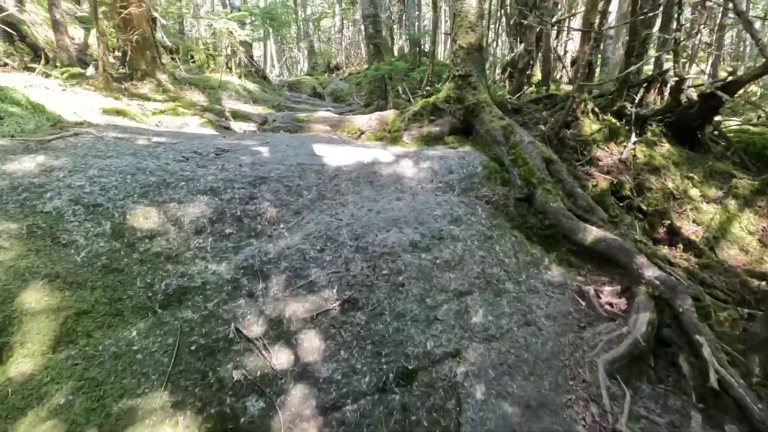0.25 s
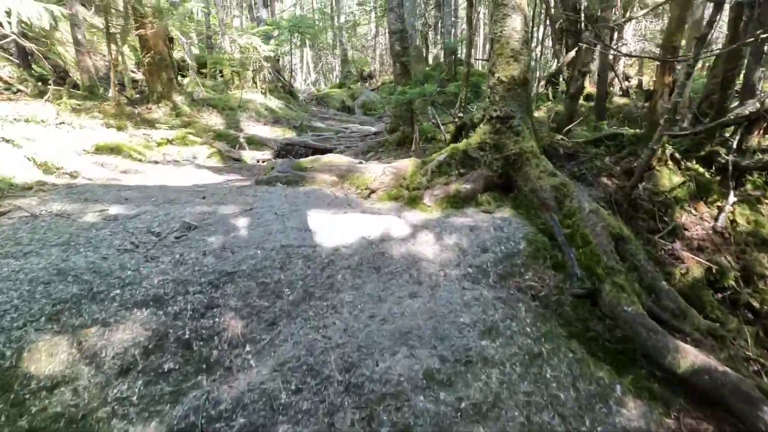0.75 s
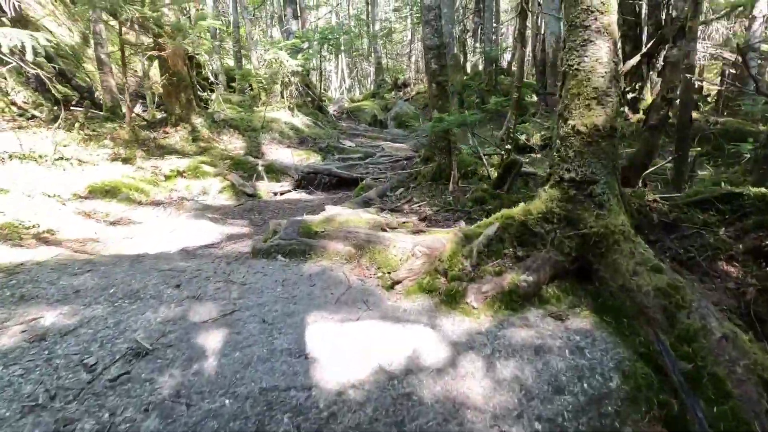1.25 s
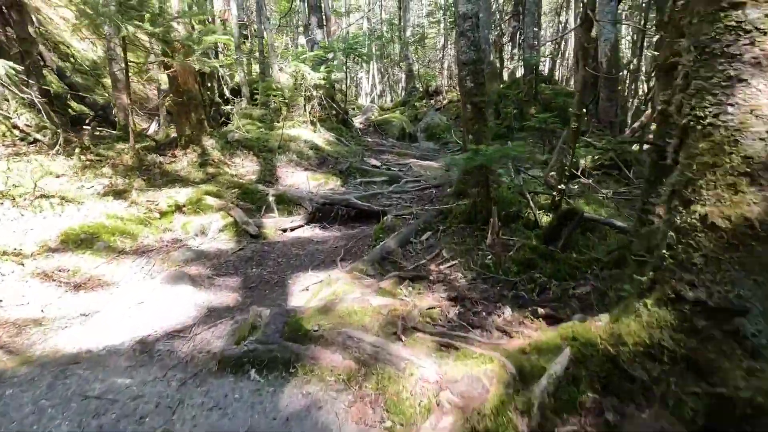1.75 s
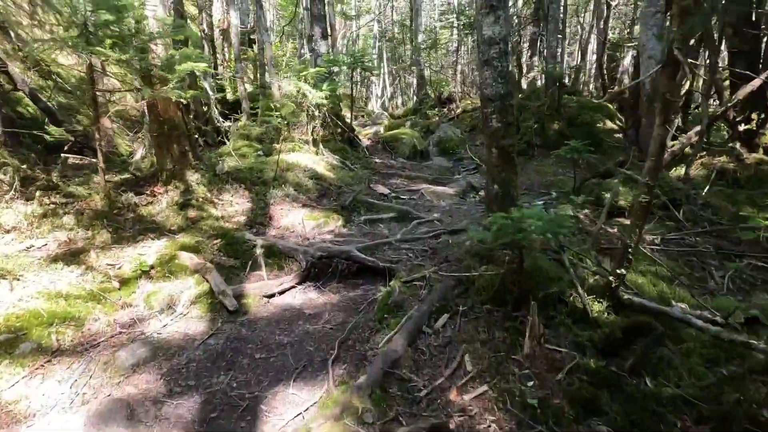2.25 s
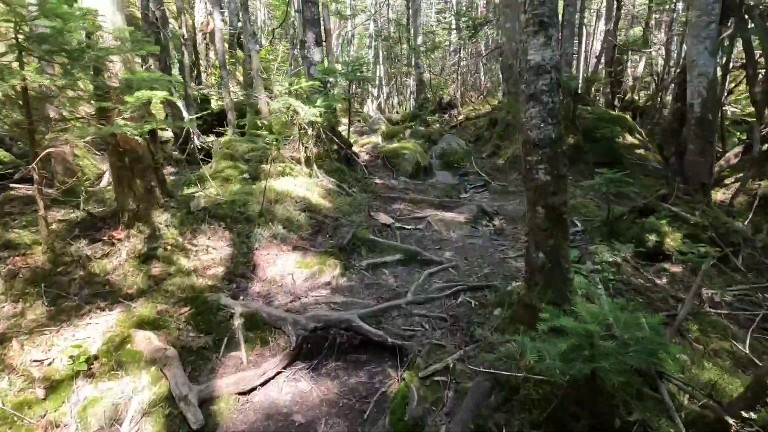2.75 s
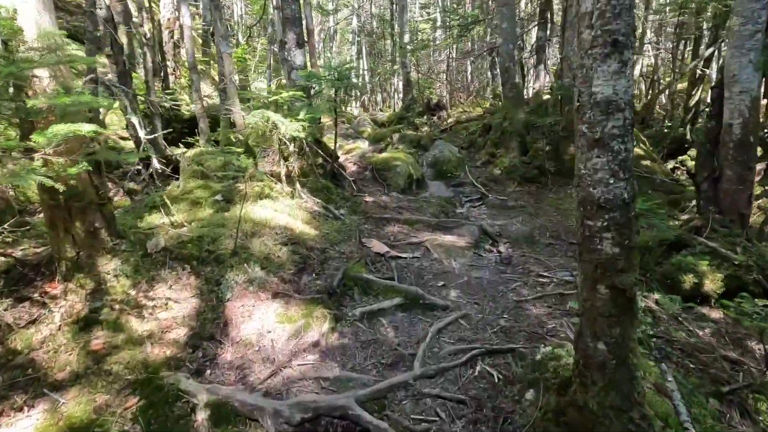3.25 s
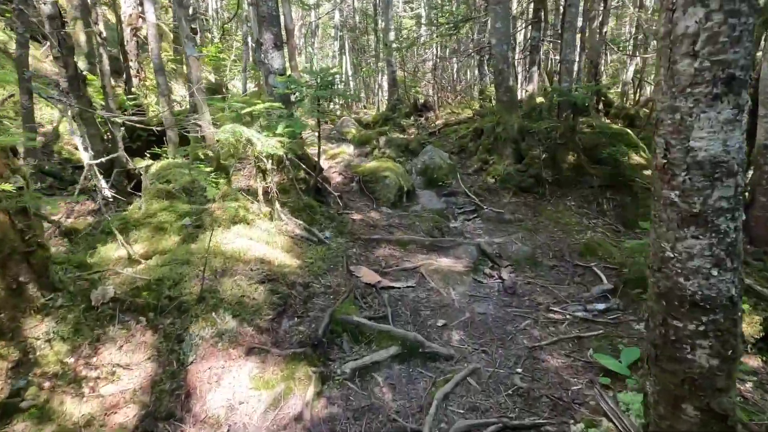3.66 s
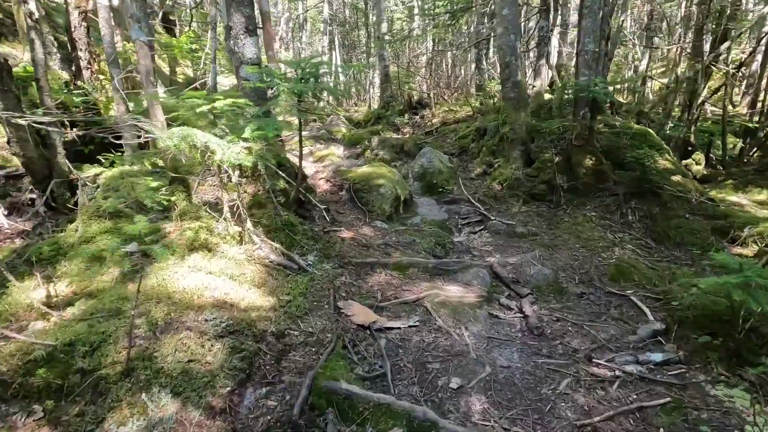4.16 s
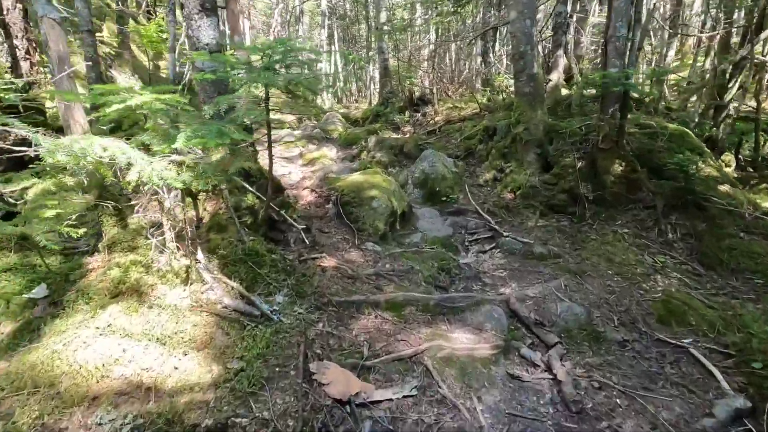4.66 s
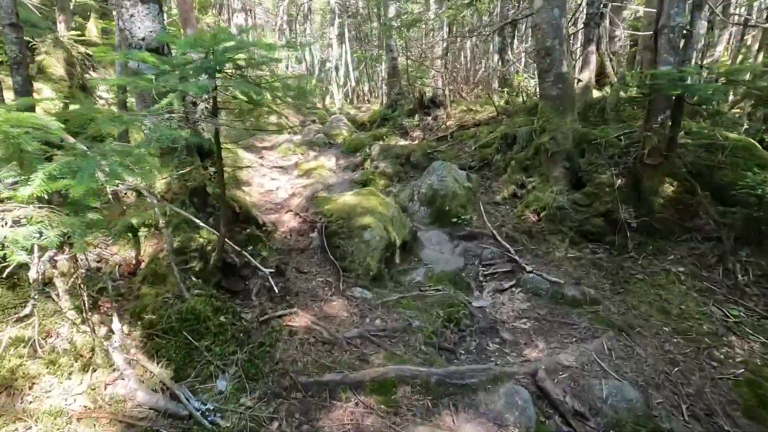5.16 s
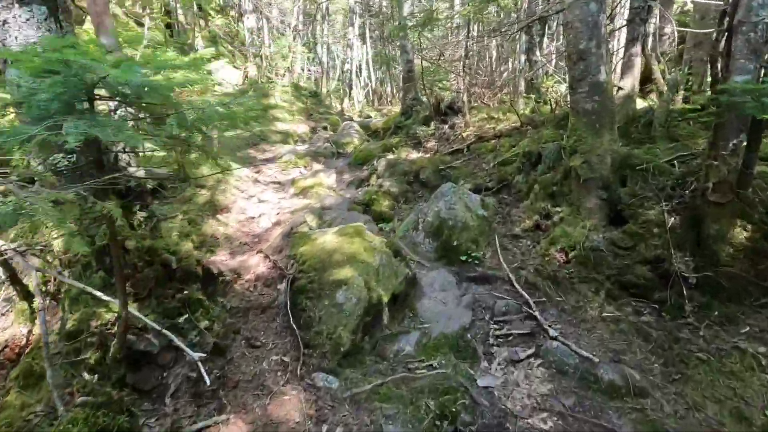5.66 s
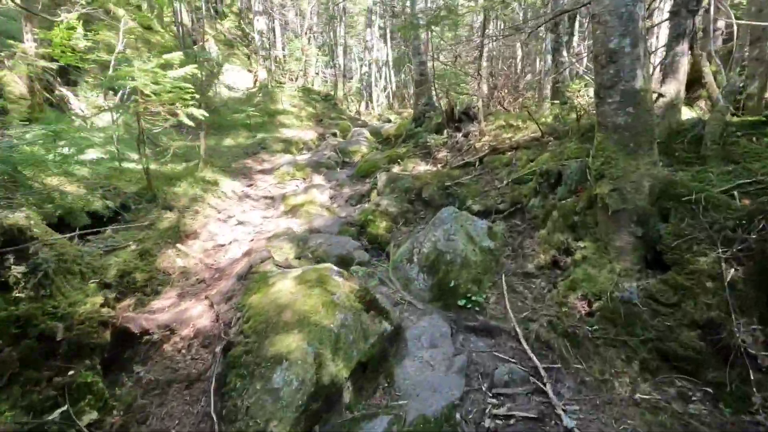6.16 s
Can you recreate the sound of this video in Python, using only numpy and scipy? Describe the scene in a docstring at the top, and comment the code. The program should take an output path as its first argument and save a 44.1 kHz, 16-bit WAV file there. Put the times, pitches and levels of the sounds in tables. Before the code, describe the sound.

Boots step unevenly along a woodland trail of dirt, roots and needles, with soft thuds, gritty scuffs and snapping twigs; a faint bird buzzes far off.

```python
"""Boots step down a forest trail of dirt, roots and needles, close to the two ports of a hand-held camera.
Heels thud as sinking tones on hollow soil, soles scuff in bursts of grains, twigs snap as damped modes.
Litter and clothes rustle between steps as swelling noise; far off a small bird repeats a thin buzzing note.
Other far birds slur and twitter; forest hush and low pressure swings of the swaying camera lie beneath."""
import sys
import numpy as np
from scipy import signal
from scipy.fft import rfft, irfft, next_fast_len
from scipy.io import wavfile
from scipy.ndimage import map_coordinates

SR = 44100
rng = np.random.default_rng(int(sys.argv[2]) if len(sys.argv) > 2 else 0)


def waveform_to_disk(signal):
    """Save audio, clipped to [-1, 1], as 16-bit WAV at the path in sys.argv[1]."""
    frames = np.transpose(np.atleast_2d(signal))
    scaled = np.clip(frames, -1, 1) * 32767
    samples = np.round(scaled).astype(np.int16)
    wavfile.write(sys.argv[1], SR, samples)


N = 282681

# Boot landings, close by: (heel time [s], heel peak [dB], base pitch [Hz], sole peak [dB],
# weight peak [dB], crunch soil drive [dB], roll from heel to weight [s])
LANDINGS = [(0.283, -28.5, 166, -56, -47, -59, 0.031), (0.347, -29.5, 167, -68, -53, -58, 0.034),
            (0.46, -46.5, 285, -69, -64, -63, 0.045), (0.821, -49, 398, -58, -72, -52.5, 0.035),
            (1.161, -47.5, 480, -39, -57, -55, 0.027), (1.244, -61, 337, -36.5, -44, -68, 0.027),
            (1.916, -28.5, 312, -60, -62, -45, 0.03), (1.93, -35, 370, -56, -51, -47, 0.011),
            (2.481, -35.5, 557, -58, -69, -50, 0.05), (2.6048, -12, 427, -32.5, -30, -41.5, .0145),
            (3.321, -35, 292, -59, -37, -43.5, 0.031), (3.367, -26.5, 462, -44, -44, -55, 0.029),
            (3.522, -27.5, 330, -33, -56, -51, 0.0236), (4.025, -32.5, 503, -35, -35, -44, 0.04),
            (4.537, -41.5, 517, -43, -55, -58, 0.029), (4.638, -44, 333, -45.5, -41.5, -52, 0.066),
            (5.196, -30.5, 335, -53, -52, -40, 0.012), (5.2124, -27.5, 413, -30, -36, -58, 0.024),
            (5.825, -39.5, 303, -49, -65, -51, 0.036), (5.996, -41, 162, -40, -49, -63, 0.028),
            (6.129, -38, 328, -54, -71, -52, 0.024), (6.192, -46, 463, -51, -76, -50.5, 0.026)]
HEEL_T60_S, SOLE_T60_S = 0.027, 0.039
HEEL_ROUGH, SOLE_ROUGH = .1, .7  # 0 smooth, 1 all uneven slips
SOLE_SHARE, SOLE_PITCH = .44, 0.783  # of the roll; of the heel's pitch
WEIGHT_BASE_HZ, WEIGHT_T60_S = 130, 0.043


def contacts():
    """Heel strikes, lower-pitched sole follows, weight pushes last: (s, peak dB, base Hz, t60 s, roughness)."""
    for s, heel_db, hz, sole_db, weight_db, _, roll in LANDINGS:
        yield s, heel_db, hz, HEEL_T60_S, HEEL_ROUGH
        yield s + SOLE_SHARE * roll, sole_db, hz * SOLE_PITCH, SOLE_T60_S, SOLE_ROUGH
        yield s + roll, weight_db, WEIGHT_BASE_HZ, WEIGHT_T60_S, HEEL_ROUGH


# Root-laced ground under a boot: (mean mode pitch [Hz], strength before coupling [dB], t60 [s])
HOLLOW_MODES = [(161.8, -8, 0.076), (253.7, 0.5, 0.043), (330.8, -1, 0.038), (663, -2, 0.025),
                (935, 7, 0.034), (1350, 12, 0.012)]


def thuds(glide=2.03, settle_s=0.00092, sag=0.741, attack_s=0.0013, ring_db=-3, reach=1.36):
    """A boot loads the soil: its pitch sinks as the contact widens, and the hollow ground answers."""
    out, t = np.zeros(N), np.arange(SR // 6) / SR
    mode_hz, mode_db, mode_t60 = np.transpose(HOLLOW_MODES)[..., None]
    for s, db, hz, t60, rough in contacts():
        pitch = hz * (sag + glide * np.exp(-t / settle_s))
        carrier = tone(pitch)
        # the soil gives way unevenly
        unevenness = map_coordinates(rng.standard_normal(len(t)), [hz * t])
        slips = np.sqrt(2) * carrier * unevenness
        push = ((1 - rough) * carrier + rough * slips) * amp(-60 * t / t60)
        # a soft contact wakes the low modes, a hard one the high modes
        coupling = 1 / (1 + (mode_hz / (reach * hz)) ** 4) / (1 + (.5 * hz / mode_hz) ** 2)
        # each spot of ground differs a little
        detune, strength_db = rng.normal([[[1]], [[0]]], [[[.05]], [[2]]], (2, len(HOLLOW_MODES), 1))
        decay = amp(mode_db + strength_db - 60 * t / mode_t60)
        ring = np.sum(coupling * decay * np.sin(2 * np.pi * mode_hz * detune * t), axis=0)
        blow = (push + amp(ring_db) * ring) * (1 - np.exp(-t / attack_s))
        add(out, s, amp(db) * blow / np.abs(blow).max())
    return np.array([out, out])


# Fine grit under the sole, also splinters: (frequency [Hz], density [dB per Hz])
GRIT_SPECTRUM = [(200, -45), (600, -45), (1000, 7), (1600, 5.5), (2800, 4), (5000, -3), (7000, -8),
                 (9500, -18), (12000, -22.5), (15000, -40)]
# Yielding soil: (frequency [Hz], density [dB per Hz])
SOIL_SPECTRUM = [(40, 7.5), (100, -14), (160, 1), (310, 0), (480, -1), (680, -6), (800, -22), (950, -16),
                 (1200, -9.5), (1800, -11.5), (5000, -82)]


def scuffs(grit_db=-3.0, chip_db=-8.0):
    """Grit and chips crackle over yielding soil; crumbs break where both are worked. The sole catches and slips."""
    grit, soil = strokes()
    slips = unit(amp(3 * wobble(170)))
    crackle = amp(grit_db) * grains(GRIT_SPECTRUM, rate=1900, spread_db=2.5, rub=.7)
    chips = amp(chip_db) * crumbs(centre_hz=2883, cycles=8, spread_db=4.8, count=2800)
    crumble = grains(SOIL_SPECTRUM, rate=750, spread_db=1.5, rub=1.0)
    crunch = crumbs(centre_hz=1075, cycles=6.7, spread_db=5.0, count=2000)
    return grit * (slips * crackle + chips) + soil * crumble + np.sqrt(grit * soil) * slips * crunch


# The sole grinds over the ground: (peak time [s], rise [s], grit drive [dB], soil drive [dB])
SCUFFS = [(.17, 0.085, -57.5, -99), (.64, 0.16, -60.5, -79), (.95, 0.18, -59.5, -79),
          (1.251, 0.086, -57, -46.5), (1.433, 0.083, -58.5, -59.5), (1.72, 0.08, -51.5, -58),
          (2.151, 0.079, -51.5, -45.5), (2.401, 0.12, -51, -51), (2.543, 0.0068, -55, -42),
          (2.654, 0.03, -39.5, -39.5), (2.753, 0.08, -55, -52.5), (2.871, 0.16, -57, -89),
          (3.058, 0.025, -53.5, -54), (3.112, 0.069, -53, -52.5), (3.172, 0.078, -52.5, -55),
          (3.501, 0.041, -40.5, -41), (4.07, 0.13, -54.5, -54.5), (4.172, 0.094, -51.5, -48.5),
          (4.541, 0.022, -59.5, -71), (4.642, 0.022, -53.5, -47), (4.729, 0.095, -53.5, -71),
          (5.22, 0.022, -46, -60), (5.331, 0.059, -53, -54), (5.462, 0.2, -61, -57.5),
          (6.034, 0.16, -59, -63), (6.16, 0.35, -62.5, -83)]
SCUFF_LINGER = 0.96  # fall time over rise time
CRUSH_RISE_S, CRUSH_FALL_S, CRUSH_GRIT_DB = 0.0033, 0.031, -7  # under a landing; grit over soil


def strokes():
    """Grit and soil drive: scuffs and crushes under landings swell and fade by 20 dB over their rise and fall."""
    t, power = np.arange(N) / SR, np.zeros((2, N))
    slides = [(s, rise, SCUFF_LINGER * rise, grit, soil) for s, rise, grit, soil in SCUFFS]
    crushes = [(s + CRUSH_RISE_S, CRUSH_RISE_S, CRUSH_FALL_S, db + CRUSH_GRIT_DB, db)
               for s, *_, db, roll in LANDINGS]
    for s, rise, fall, grit, soil in slides + crushes:
        steepness = np.maximum((s - t) / rise, (t - s) / fall)
        stroke = amp(-20 * steepness.clip(0, 10))
        power += (amp([[grit], [soil]]) * stroke) ** 2
    return np.sqrt(power)


# Twigs and pebbles: (time [s], ring peak [dB], central pitch [Hz], splinters over the peak [dB])
SNAPS = [(0.159, -36.5, 1550, -35), (0.28, -38, 1300, -38), (0.344, -40.5, 2300, -10.5),
         (0.449, -43.5, 1290, -23), (1.163, -35.5, 1200, -42), (1.247, -39.5, 1540, -30),
         (1.403, -41, 1400, -36), (1.559, -40.5, 2740, -19.5), (1.674, -37.5, 1050, -15.5),
         (2.089, -35.5, 1400, -30), (2.142, -26.5, 1400, -32), (2.16, -34.5, 1340, -24),
         (2.393, -31, 1220, -9), (2.537, -34.5, 1870, -5), (2.6052, -16, 890, -41), (2.642, -26, 1460, -33),
         (2.957, -41, 1560, -24), (3.101, -30.5, 2490, -10.5), (3.116, -39, 1230, -2),
         (3.144, -31.5, 1000, -21), (3.209, -29.5, 1770, -15), (3.352, -36, 1026, -14),
         (3.485, -36, 1040, -18), (3.501, -36, 794, -21), (3.506, -25.5, 790, -29),
         (3.513, -28.5, 834, -26), (4.022, -26.5, 1950, -20), (4.16, -44, 1280, -14),
         (4.204, -34.5, 2070, -17), (4.637, -42, 1970, -9), (4.676, -40.5, 630, -22),
         (4.901, -44, 1210, -5.5), (5.196, -29, 1050, -14), (5.2138, -36.5, 1300, -11),
         (5.23, -35.5, 640, -6.5), (5.334, -36.5, 1037, -35), (5.365, -40.5, 1070, -28),
         (5.461, -40, 1010, -33), (5.613, -41, 1340, -17), (5.769, -43, 2010, -34), (5.823, -39, 1400, -25),
         (6.146, -35, 1500, -26), (6.165, -39, 2200, -17.5)]


def snaps(cycles=14, splinter_t60=0.027, dull=1.56):
    """A twig breaks or a pebble ticks: heavily damped modes around its pitch and a splintering tail."""
    out, t = np.zeros((2, N)), np.arange(SR // 16) / SR
    onset = 1 - np.exp(-(t / .0006) ** 2)
    for s, db, hz, splinter_db in SNAPS + ticks():
        modes = hz * np.geomspace(.85, 1.9, num=6)[:, None] * amp(rng.normal(0, .6, (6, 1)))
        # the phases differ a little between left and right
        phase = rng.uniform(0, 2 * np.pi, (6, 1)) + rng.normal(0, .55, (2, 6, 1))
        ring = np.sum((hz / modes) ** dull * np.sin(2 * np.pi * modes * t + phase), axis=1)
        ring = ring * onset * amp(-60 * t * hz / cycles)  # falls 60 dB in so many cycles
        splinters = stereo(rng.standard_normal((2, len(t))), GRIT_SPECTRUM)
        splinters = splinters * amp(splinter_db - 60 * t / splinter_t60)
        add(out, s, amp(db) * (ring / np.abs(ring).max() + splinters))
    return out


TICKS_PER_S, TICK_HZ = 16, 1700  # median pitch
TICK_DB, TICK_SPREAD_DB = 8.5, 4  # typical peak over the stir drive


def ticks(splinter_db=-21, most=0.69):
    """Lesser twigs give way at random, louder in stirred litter: (s, peak dB, pitch Hz, splinters dB)."""
    s = rng.uniform(0, N / SR, int(TICKS_PER_S * N / SR))
    size, pitch = rng.standard_normal((len(s), 2)).T
    db = np.interp(s, *np.transpose(STIR)) + TICK_DB + TICK_SPREAD_DB * np.minimum(size, most)
    return [(*row, splinter_db) for row in zip(s, db, TICK_HZ * amp(2.2 * pitch))]


# Modes of a dry stick: (pitch [Hz], relative level [dB], t60 [s])
STICK_MODES = [(2340, -18, 0.044), (2560, 1.5, 0.0067), (3500, -3.5, 0.0058)]
# The stick is kicked and rebounds: (time [s], peak [dB])
CLACKS = [(2.729, -24.5), (2.734, -40.5)]


def stick(attack_s=0.00036):
    """A dry stick rings briefly in a few damped modes at each clack."""
    out, t = np.zeros(N), np.arange(SR // 20) / SR
    ring = sum(amp(db - 60 * t / t60) * np.sin(2 * np.pi * hz * t) for hz, db, t60 in STICK_MODES)
    ring = ring * (1 - np.exp(-t / attack_s))
    for s, db in CLACKS:
        add(out, s, amp(db) * ring / np.abs(ring).max())
    return np.array([out, out])


# Needles and cloth: (frequency [Hz], density [dB per Hz])
LITTER_SPECTRUM = [(300, -39), (800, -11), (1500, 3), (2600, -5.5), (4000, -9), (7200, -14), (9700, -25),
                   (12000, -29.5), (15000, -47)]
# How hard the litter is stirred: (time [s], drive [dB])
STIR = [(0.0, -65), (0.36, -59.5), (0.6, -69.5), (1.11, -72), (1.3, -65), (1.62, -65.5), (2.09, -56),
        (2.61, -58.5), (2.98, -72), (3.28, -61), (3.66, -64), (3.97, -65.5), (4.14, -56.5), (4.32, -65),
        (4.6, -64), (4.8, -58), (5.39, -57), (5.62, -67.5), (6.09, -70), (6.28, -88)]
# Dull shifting of the soil: (time [s], drive [dB])
DULL = [(0.0, -63.5), (.42, -71), (0.58, -73.5), (1.0, -59.5), (1.5, -60.5), (1.86, -59.5), (2.55, -57),
        (3.0, -64.5), (3.27, -63.5), (4.3, -62), (4.46, -66.5), (4.7, -60), (5.34, -53.5), (5.6, -62.5),
        (5.96, -69), (6.41, -70)]


def rustle(grit_db=-4.5, crunch_db=-14.5, swell_db=1.96):
    """Needles and cloth shift in small clumps as the weight moves; a few crumbs give way."""
    (stir,), (soil,) = curves(STIR), curves(DULL)
    stir = stir + swell_db * wobble(9)
    clumps = wobble(45)
    fine = amp(stir + grit_db + 2.26 * clumps) * grains(LITTER_SPECTRUM, rate=1100, spread_db=2.0, rub=1.63)
    dull = amp(soil + 1.94 * clumps) * grains(SOIL_SPECTRUM, rate=200, spread_db=3.0, rub=1.0)
    coarse = amp(2.5 * clumps) * crumbs(centre_hz=1500, cycles=3.2, spread_db=4.2, count=1200)
    return fine + dull + amp((soil + stir) / 2 + crunch_db) * coarse


def grains(spectrum, rate, spread_db, rub):
    """Tiny fractures of uneven size, rate a second, on top of smooth rubbing."""
    sizes = amp(spread_db * np.minimum(rng.exponential(size=N), 4))
    sizes = sizes * (rng.random(N) < rate / SR)
    fractures = unit(sizes * rng.standard_normal((2, N)))
    return stereo(fractures + rub * rng.standard_normal((2, N)), spectrum)


def crumbs(centre_hz, cycles, spread_db, count):
    """Coarse bits that break one by one, each with its own pitch, size and side; rms 1."""
    start = rng.integers(N, size=count)
    pitch, lean = rng.standard_normal((2, count, 1))
    size = amp(spread_db * np.minimum(rng.exponential(size=(count, 1)), 3))
    k = np.arange(SR // 70)
    turns = centre_hz * np.exp(.5 * pitch.clip(-2, 2)) * k / SR
    bits = size * np.sin(2 * np.pi * turns) * turns * np.exp(-4 * turns / cycles)
    place = (start[:, None] + k).ravel()
    sides = [np.bincount(place, (bits * amp(side * lean)).ravel(), N)[:N] for side in (3, -3)]
    return unit(np.array(sides))


# A far bird's note: (mean whistle [Hz], mean start of the buzz [Hz], flutter scale [Hz])
BUZZ = (7860, 8120, 340)
# Its evenly spaced notes, one column: (drive [dB])
NOTES_DB = [-78, -77, -76, -74, -70.5, -71.5, -72.5, -71, -77]
SONG_START_S, NOTE_PERIOD_S = 3.272, .155
SONG_PEAK_S, SONG_SWELL_S, SONG_FADE_S = 4.17, 0.68, 0.36  # effort swells and fades
BUZZ_RISE_HZ = 1000  # at full effort


def bird(buzz=0.7, length_s=.115):
    """Each note is a thin whistle under a buzz that rises with effort. The trees smear the notes."""
    out, t = np.zeros((2, N)), np.arange(int(length_s * SR)) / SR
    whistle_hz, buzz_hz, flutter_hz = BUZZ
    shape = signal.windows.tukey(len(t), .2) * (1 - t / length_s / 2)
    for k, db in enumerate(NOTES_DB):
        s = SONG_START_S + NOTE_PERIOD_S * k
        effort = np.exp(-max((SONG_PEAK_S - s) / SONG_SWELL_S, (s - SONG_PEAK_S) / SONG_FADE_S) ** 2)
        flutter = flutter_hz * wobble(1200)[:len(t)]
        rise = BUZZ_RISE_HZ * effort ** 2 * t / length_s
        note = tone(whistle_hz + flutter / 2) + buzz * tone(buzz_hz + rise + flutter)
        note = note * amp(4 * wobble(70)[:len(t)])
        add(out, s, amp(db) * unit(note * shape))
    return (out + trees(out, t60=.07)) / np.sqrt(2)


# Far birds' thin slurs: (time [s], length [s], middle pitch [Hz], rise of the ends [Hz],
# centre level [dB], left over right [dB])
CHIRPS = [(4.965, .058, 12000, 750, -75, 4), (5.145, .075, 12050, 600, -79, 4),
          (5.02, .115, 6200, -380, -70, -9)]
# A blurred twitter: (time [s], length [s], mean pitch [Hz], swing scale [Hz],
# level before the trees [dB], left over right [dB])
WARBLE = (4.85, .36, 5400, 600, -71, -9)


def far_calls():
    """Two very high dipping calls on the left; on the right a twitter with one arched whistle."""
    slurs, twitter = np.zeros((2, 2, N))
    sides = lambda lean_db: amp([[lean_db / 2], [-lean_db / 2]])
    for s, span, hz, bend_hz, db, lean_db in CHIRPS:
        u = np.linspace(-1, 1, int(span * SR))
        call = tone(hz + bend_hz * np.abs(u) ** 1.5) * (1 - u * u)
        add(slurs, s, amp(db) * sides(lean_db) * call)
    s, span, hz, swing_hz, db, lean_db = WARBLE
    swing = wobble(110)[:int(span * SR)]
    warble = tone(hz + swing_hz * swing) * signal.windows.tukey(len(swing), .5)
    add(twitter, s, amp(db) * sides(lean_db) * warble)
    return slurs + trees(twitter, t60=.15)


# What the trunks throw back: (frequency [Hz], relative level [dB])
SCATTER = [(80, 5.5), (300, -4), (1000, 1.5), (8000, -2)]


def trees(x, t60):
    """Trunks scatter a thin decaying tail of sound; the direct sound is left out."""
    t = np.arange(SR // 2) / SR
    tail = stereo(rng.standard_normal((2, len(t))), SCATTER) * amp(-60 * t / t60)
    return signal.fftconvolve(x, tail / np.linalg.norm(tail[0]), axes=1)[:, :N]


# Hush of the forest: (frequency [Hz], density [dB per Hz])
FOREST_SPECTRUM = [(40, 7), (90, -15.5), (200, 2.5), (400, -14.5), (800, -21), (1500, -31), (3000, -35),
                   (5200, -21.5), (7500, -24), (10000, -39), (12000, -31.5), (15000, -73)]
# Pressure swings at the ports: (frequency [Hz], density [dB per Hz])
SWAY_SPECTRUM = [(2, -24), (5, -6), (9, -1.5), (14, -7), (22, -14.5), (35, -28.5), (55, -39.5), (100, -48),
                 (250, -93.5)]
# One puff of air on the ports: (time [s], half width to 1/e [s], level [dB])
GUST = (0.665, 0.04, -41)
# Colour of the puff: (frequency [Hz], density [dB per Hz])
GUST_SPECTRUM = [(12, -5), (28, 8), (42, 10), (62, -4), (200, -65)]


def air(forest_db=-64.0, sway_db=-36.0, drift_db=1):
    """The hush of the forest, slow pressure swings as the camera sways, and one puff of air."""
    t = np.arange(N) / SR
    s, width, gust_db = GUST
    sway = amp(sway_db + drift_db * wobble(3.06)) * stereo(rng.standard_normal((2, N)), SWAY_SPECTRUM)
    puff = np.exp(-((t - s) / width) ** 2)
    gust = amp(gust_db) * puff * stereo(rng.standard_normal((2, N)), GUST_SPECTRUM)
    hush = amp(forest_db) * stereo(rng.standard_normal((2, N)), FOREST_SPECTRUM)
    ease = signal.windows.tukey(N, .01)  # brief fade at both ends
    return ease * sway + gust + hush


# Likeness of left and right: (frequency [Hz], likeness [0-1])
ALIKE = [(100, 0.95), (350, 0.68), (1000, 0.077), (4000, 0.31), (12000, 0.96)]


def stereo(pair, spectrum):
    """Two unrelated signals become a coloured left and right, most alike in the bass and top treble; mid has rms 1."""
    turn = lambda hz: np.arccos(np.clip(along(ALIKE, hz), -1, 1)) / 2
    split = lambda hz: amp(along(spectrum, hz)) * [np.cos(turn(hz)), np.sin(turn(hz))]
    mid, side = filtered(pair, split)
    return np.array([mid + side, mid - side]) / np.std(mid)


def tone(hz):
    """A sine that follows a pitch curve."""
    return np.sin(2 * np.pi * np.cumsum(hz) / SR)


def wobble(rate):
    """A smooth random curve, rate knots a second."""
    return map_coordinates(rng.standard_normal(int(N * rate / SR) + 4), [np.arange(N) * rate / SR])


def filtered(x, response):
    """x times a complex response of frequency."""
    size = x.shape[-1]
    m = next_fast_len(size + size // 4)
    return irfft(rfft(x, m) * response(np.fft.rfftfreq(m, 1 / SR)), m)[..., :size]


def add(track, s, sound):
    """Mix a sound into the track at time s."""
    part = track[..., max(round(s * SR), 0):][..., :sound.shape[-1]]
    part += sound[..., :part.shape[-1]]


def along(points, hz):
    """Interpolate (Hz, value) points on a log frequency axis."""
    f, v = np.transpose(points)
    return np.interp(np.log(hz + 1), np.log(f + 1), v)


def curves(rows):
    """One value per sample for each column after the time."""
    s, *cols = np.transpose(rows)
    return [np.interp(np.arange(N) / SR, s, c) for c in cols]


def amp(db):
    """Decibels to an amplitude factor."""
    return 10 ** (np.asarray(db) / 20)


def unit(x):
    """Scale to rms 1."""
    return x / np.sqrt(np.mean(x ** 2) + 1e-20)


def scene():
    """Steps close by and their scatter from the trees, with the woods around them."""
    steps = thuds() + snaps() + stick() + scuffs()
    return steps + amp(-13.0) * trees(steps, t60=0.17) + rustle() + bird() + far_calls() + air()


# Colour of the two ports: (frequency [Hz], left over right [dB])
PORTS = [(15, -5.5), (60, -1.5), (200, -1.3), (370, 2), (680, 4.5), (1200, 6.5), (2300, 6), (4200, 2),
         (7800, 2), (11500, 12.5), (14500, 32)]
# Phase between the ports: (frequency [Hz], lead of the left [rad])
PORT_PHASE = [(500, -0.042), (1400, -1.03), (2200, -1.2), (4000, 1), (7000, -1.17)]
TOP_HZ = 14750


def record(dry):
    """The two microphone ports differ in colour and phase; nothing passes above the band limit."""
    def ports(hz):
        lean = amp(along(PORTS, hz))
        turn = np.exp(.5j * along(PORT_PHASE, hz))
        return np.array([2 * lean * turn, 2 / turn]) / (1 + lean) * (hz < TOP_HZ)
    return filtered(dry, ports)


dry = scene()
out = record(dry)
waveform_to_disk(out)
```